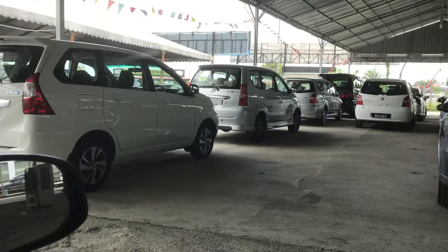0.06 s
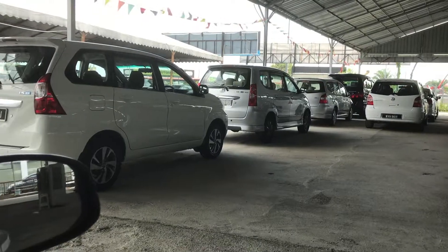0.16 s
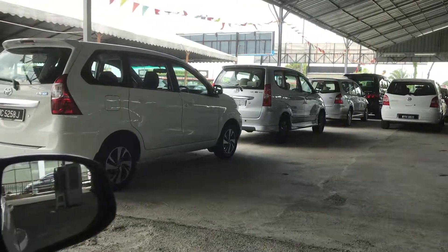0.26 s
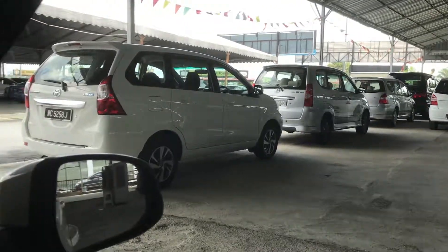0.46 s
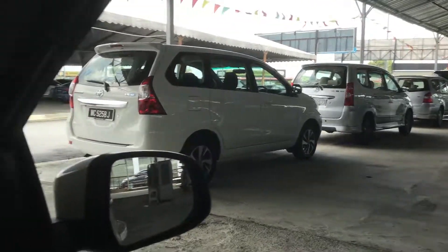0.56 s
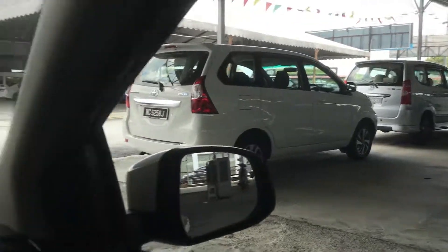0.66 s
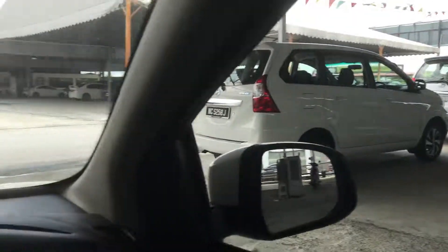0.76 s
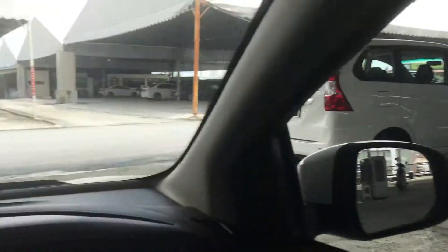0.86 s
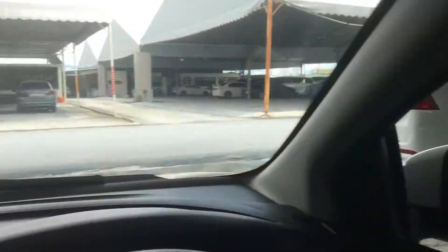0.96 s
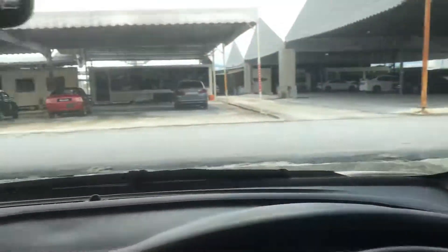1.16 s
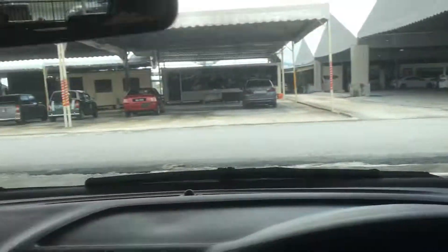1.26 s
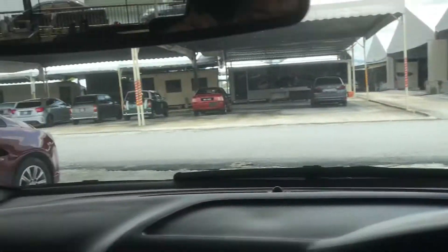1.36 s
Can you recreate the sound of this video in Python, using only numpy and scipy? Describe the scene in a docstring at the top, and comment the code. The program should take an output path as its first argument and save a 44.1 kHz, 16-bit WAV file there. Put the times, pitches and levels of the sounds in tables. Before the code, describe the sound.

An electric window closes with a low thump inside a parked, idling car.

```python
"""First you hear an electric motor whirring under hiss from outside: a car window is closing.
The glass whistles in its guides, thumps into the frame and shuts the hiss out, then squeaks
against the rubber seal as the motor stalls. Inside the parked car the engine idles on
with a low hum, and a few faint clicks and one crisp plastic knock follow."""
import sys
import numpy as np
from scipy import signal
from scipy.fft import rfft, irfft
from scipy.io import wavfile

SR = 44100
rng = np.random.default_rng(int(sys.argv[2]) if len(sys.argv) > 2 else 0)


def file_out(sig):
    """Save sig as 16-bit WAV at sys.argv[1]."""
    # one column per channel
    cols = np.atleast_2d(sig).T
    # limit, then scale
    lim = np.clip(cols, -1, 1)
    pcm = np.round(lim * 32767).astype(np.int16)
    wavfile.write(sys.argv[1], SR, pcm)


N = 61739
T = np.arange(N) / SR
FREQS = np.fft.rfftfreq(N, 1 / SR)


def amp(db):
    """Turns decibels into a number to multiply by."""
    return 10 ** (np.asarray(db) / 20)


def unit(x):
    """Scales x to an average strength (rms) of 1."""
    return x / np.sqrt(np.mean(x ** 2) + 1e-20)


def curve(table, column=1):
    """Joins the rows of a time table by straight lines."""
    rows = np.transpose(table)
    return np.interp(T, rows[0], rows[column])


def look_up(table, hz, column=1):
    """Reads between the rows of a frequency table, on a log scale."""
    rows = np.transpose(table)
    return np.interp(np.log(hz + 1), np.log(rows[0]), rows[column])


def colour(x, table):
    """Turns each frequency of x up or down by the table, then scales to strength 1."""
    return unit(irfft(rfft(x) * amp(look_up(table, FREQS)), N))


def noise(table):
    """Steady noise, shaped by the table."""
    return colour(rng.standard_normal(N), table)


def drift(rate_hz):
    """Smooth random wandering of strength 1."""
    return unit(irfft(rfft(rng.standard_normal(N)) / (1 + (FREQS / rate_hz) ** 4), N))


def decay(age, fade_s):
    """Starts at 1 and falls 60 dB in the fade time."""
    return np.exp(-np.log(1000) * np.maximum(age, 0) / fade_s)


def rub(middle, spread_s, db, hz, width_hz, slips_per_s=3300):
    """Tiny slips of friction make a surface ring near one pitch, swelling and fading."""
    slips = rng.standard_normal(N) * (rng.random(N) < slips_per_s / SR)
    spin = np.exp(2j * np.pi * np.cumsum(hz * np.ones(N)) / SR)  # lets the pitch slide
    damping = np.exp(-np.pi * width_hz / SR)
    ring = spin * signal.lfilter([1], [1, -2 * damping, damping ** 2], slips / spin)
    return amp(db) * unit(ring.real) * np.exp(-((T - middle) / spread_s) ** 2 / 2)


# Each entry: multiple of the engine's firing rate, level in dB.
ENGINE_TONES = {1: -56.5, 2: -46, 5: -46, 6: -59.5, 10: -65}
# A thin whine. Each row: pitch in Hz, level in dB.
THIN_TONES = [(1448, -76), (1857, -81)]
# Rumble and ventilation. Each row: frequency in Hz, relative level in dB.
RUMBLE = [(15, -39), (42, -38), (57, 8.5), (73, 1), (88, 0), (130, -8.5), (200, -13), (270, -16),
          (420, -25), (800, -33), (1200, -33.5), (1430, -34.5), (1650, -37.5), (1870, -40), (2300, -44),
          (5000, -56), (16000, -63.5)]

def cabin(firing_hz=26.92, waver_db=3):
    """The idling engine's hum and a thin whine waver over a low rumble."""
    tones = [(k * firing_hz, db) for k, db in ENGINE_TONES.items()] + THIN_TONES
    hum = 0
    for hz, db in tones:
        level = amp(db + waver_db * drift(rate_hz=7.1))
        hum += level * np.sin(2 * np.pi * (hz * T + rng.random()))
    return np.sqrt(2) * hum + amp(-43) * noise(RUMBLE)


# Faint air hiss. Each row: frequency in Hz, relative level in dB.
AIR_HISS = [(500, -29), (2400, 0), (4100, 1.5), (4900, -2.5), (5800, 1.5), (7800, 3), (8800, -2.5),
            (9600, 4.5), (10500, -9), (12000, 5.5), (13200, -5), (15500, 3)]
# The hiss slowly grows. Each row: time in seconds, level in dB.
AIR_RISE = [(.4, -72.5), (.7, -70), (.77, -67.5), (1.4, -66)]
# Each row: middle and spread in seconds, level in dB, pitch and band width in Hz.
SOFT_RUSTLES = [(.775, 0.015, -69, 7000, 4000), (1.016, 0.02, -73, 6500, 700)]

def air(flutter_hz=60):
    """Faint, fluttering air hiss with two soft rustles."""
    flutter = 1 + .18 * np.sin(2 * np.pi * (flutter_hz * T + rng.random()))
    flicker = amp(1.97 * drift(rate_hz=440))
    hiss = amp(curve(AIR_RISE)) * flutter * flicker * noise(AIR_HISS)
    return hiss + sum(rub(*row) for row in SOFT_RUSTLES)


# Each row: start in seconds, level in dB, pitch and band width in Hz, fade time in seconds.
GLASS_AND_TRIM_CLICKS = [(0.3052, -33.5, 3900, 448, 0.016), (0.3086, -35, 1460, 2180, 0.039),
                         (0.3384, -49, 2780, 2220, 0.062), (0.4585, -54, 2330, 596, 0.018),
                         (0.4625, -46.5, 1360, 340, 0.016), (0.4729, -55, 1850, 600, 0.029),
                         (0.667, -63, 449, 146.8, .05), (1.073, -64, 3460, 600, 0.054)]

def click(start, db, centre_hz, width_hz, fade_s):
    """Glass or trim snaps and rattles briefly, leaving a faint echo in the cabin."""
    age = T - start
    rise = np.clip(age / 0.00028, 0, 1)
    echo = amp(-25) * decay(age, fade_s=.12)
    burst = rng.standard_normal(N) * rise * (decay(age, fade_s) + echo)
    burst[round(start * SR)] += amp(13)  # the snap
    low_hz = np.hypot(centre_hz, width_hz / 2) - width_hz / 2
    band = signal.butter(1, [low_hz, low_hz + width_hz], "band", fs=SR, output="sos")
    ring = signal.sosfilt(band, burst)
    softened = signal.lfilter(*signal.butter(4, 4530, "low", fs=SR), ring)
    return amp(db) * np.sqrt(SR / (np.pi * width_hz)) * softened


# Each row: pitch in Hz, relative level in dB, fade time in seconds.
PLASTIC_TONES = [(330, 0.5, 0.0097), (510, -1, 0.019), (1190, -2.5, 0.0038), (2450, -7, 0.0036),
                 (6200, -15, .002)]

def knock(start=1.1284, level_db=-35.5):
    """A small plastic part snaps and rings very briefly."""
    age = np.maximum(T - start, 0)
    return sum(amp(level_db + db) * decay(age, fade_s) * np.sin(2 * np.pi * hz * age)
               for hz, db, fade_s in PLASTIC_TONES)


# Hiss from outside. Each row: frequency in Hz, relative level in dB.
GAP_HISS = [(30, -17), (110, 15.5), (220, 12.5), (330, 3.5), (500, 2), (1000, -14.5), (1350, 0),
            (1900, -4.5), (2400, -2.5), (3100, -6.5), (3600, -3), (4100, -6.5), (4400, -5.5), (4950, -11),
            (5800, -7.5), (7500, -10), (9000, -13), (10300, -17), (11300, -14), (13500, -13.5),
            (16000, -19)]

def outside(shut_s=.311):
    """Hiss comes through the gap until the glass meets the seal; a last leak is squeezed shut."""
    gap = .5 - .5 * np.tanh((T - shut_s) / 0.0018)  # 1 is open, 0 is shut
    narrowing_db = 3 * np.exp(-((T - 0.333) / 0.081) ** 2)  # louder as the gap narrows
    swell = amp(narrowing_db + 0.74 * drift(rate_hz=27))
    leak = amp(-13.5) * decay(T - shut_s, fade_s=0.34)
    return amp(-43) * noise(GAP_HISS) * (gap * swell + (1 - gap) * leak)


# Each row: middle and spread in seconds, level in dB, pitch and band width in Hz.
GUIDE_WHISTLES = [(0.12, 0.053, -59.5, 8750, 350), (0.233, 0.038, -55.5, 4410, 130),
                  (0.254, 0.016, -53.5, 2230, 900)]

def guides():
    """The sliding glass whistles briefly in its guides."""
    return sum(rub(*row) for row in GUIDE_WHISTLES)


def seal(middle=.361, fall_hz_per_s=7000):
    """The rubber seal squeaks, its pitch sinking as the glass slows."""
    squeak_hz = 1830 - fall_hz_per_s * np.clip(T - middle, -.1, .1)
    return rub(middle, spread_s=0.011, db=-45.5, hz=squeak_hz, width_hz=470)


# Each row: time in seconds, shaft turns per second, level in dB.
MOTOR_RUN = [(0, 69.2, -50), (.11, 70.95, -53), (.22, 69.4, -54), (.3, 68.68, -53.5), (.325, 68.7, -54),
             (.355, 66.3, -49.5), (.375, 57.83, -68.5), (.395, 35.44, -79)]
# Each entry: multiple of the shaft speed, relative level in dB.
MOTOR_TONES = {4: -7, 6: -10, 9: -14.5, 10: 0, 13: -10, 17: -12, 19: -12, 20: 0.33}
# How the door muffles gears and brushes. Each row: frequency in Hz, relative level in dB.
THROUGH_DOOR = [(100, -28), (400, -3), (900, 3), (1350, 1.5), (1700, -10.5), (2600, -23), (4400, -19),
                (7000, -19), (16000, -34)]

def motor(slots=10, wobble=0.0013):
    """The slotted rotor whines, gears buzz and brushes hiss, following the shaft as it stalls."""
    shaft_hz = curve(MOTOR_RUN) * (1 + wobble * drift(rate_hz=16))
    angle = 2 * np.pi * np.cumsum(shaft_hz) / SR
    whine = 0
    for k, db in MOTOR_TONES.items():
        level = amp(db + 2.65 * drift(rate_hz=34))
        whine += np.sqrt(2) * level * np.sin(k * angle + 2 * np.pi * rng.random())
    gears = sum(np.sin(k * angle + 2 * np.pi * rng.random())
                for k in range(3, 70) if k not in MOTOR_TONES)
    brushes = rng.standard_normal(N) * (1 + 0.44 * np.cos(slots * angle))
    muffled = amp(0.5) * colour(gears, THROUGH_DOOR) + amp(-3) * colour(brushes, THROUGH_DOOR)
    return amp(curve(MOTOR_RUN, column=2)) * (whine + muffled)


# The glass hits the frame, then settles. Each row: start in seconds, level in dB.
GLASS_HITS = [(0.3107, -11.5), (0.3417, -29)]
# Door and cabin ringing. Each row: pitch in Hz, relative level in dB, fade time in seconds.
DOOR_TONES = [(58, -35, 0.12), (92.8, 2, 0.13), (105.2, -16, 0.83), (126.8, -26.5, 0.48), (169.6, -8, 0.25),
              (266.1, -10.5, 0.131), (286.9, -11.5, 0.12)]
# The panel's boom. Each row: frequency in Hz, relative level in dB, fade time in seconds.
PANEL_BOOM = [(30, -25, .15), (98, 2, 0.63), (194, -13.5, 0.42), (250, -8, 0.27), (405, -14.5, 0.28),
              (796, -30.5, .15), (2000, -52, 0.11)]

def thump(start, db, rise_s=0.011):
    """The glass, cushioned by rubber, makes the door ring low; the panel booms on."""
    age = T - start
    rise = np.sin(np.pi / 2 * np.clip(age / rise_s, 0, 1)) ** 2
    ring = -sum(amp(level) * decay(age, fade_s) * np.sin(2 * np.pi * hz * age)
                for hz, level, fade_s in DOOR_TONES)
    # split noise into bands so that each fades at its own pace
    band_hz, times, bands = signal.stft(noise(PANEL_BOOM), SR, nperseg=1024)
    band_fade_s = look_up(PANEL_BOOM, band_hz, column=2)[:, None]
    boom = signal.istft(bands * decay(times - start, band_fade_s), SR)[1][:N]
    return amp(db) * rise * (ring + amp(-17.5) * boom)


def scene():
    """Adds the background, the small clicks and the closing window into one channel."""
    background = cabin() + air() + outside()
    clicks = sum(click(*row) for row in GLASS_AND_TRIM_CLICKS) + knock()
    window = guides() + seal() + motor() + sum(thump(*row) for row in GLASS_HITS)
    return (background + clicks + window)[None]


def record(dry, top_hz=15800):
    """Cuts away the very highest treble."""
    low_pass = signal.firwin(511, top_hz, window=("kaiser", 9), fs=SR)
    return signal.oaconvolve(dry, low_pass[None], "same")


dry = scene()
out = record(dry)
file_out(out)
```